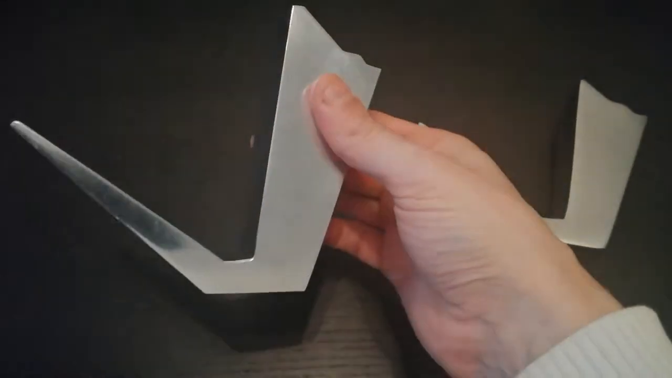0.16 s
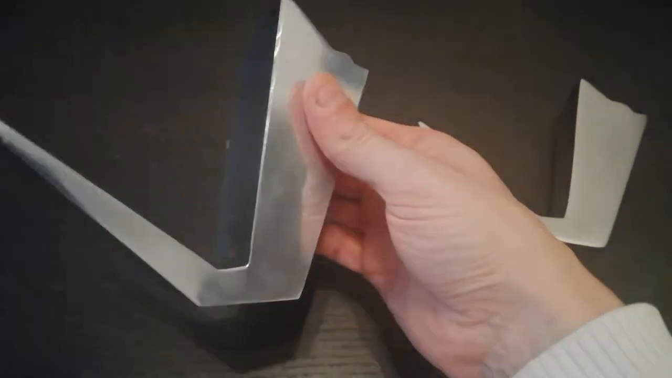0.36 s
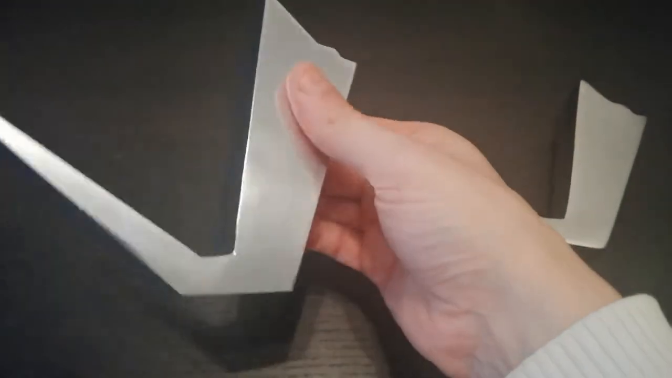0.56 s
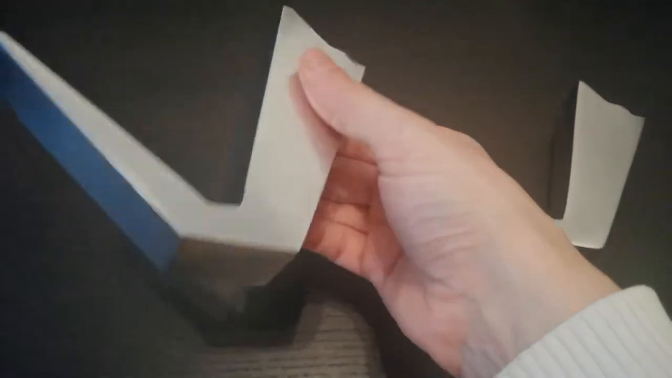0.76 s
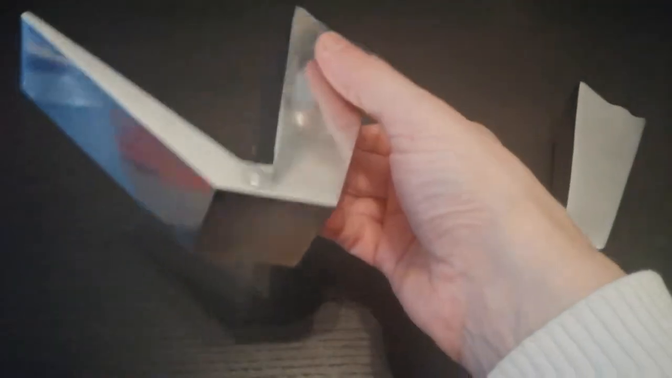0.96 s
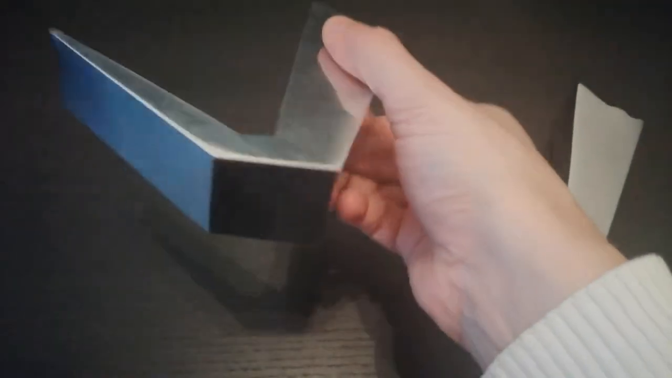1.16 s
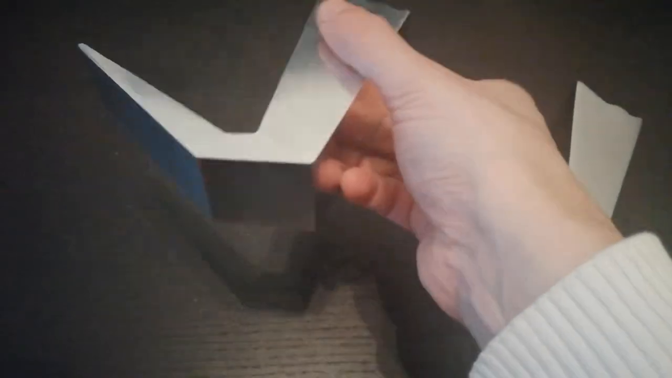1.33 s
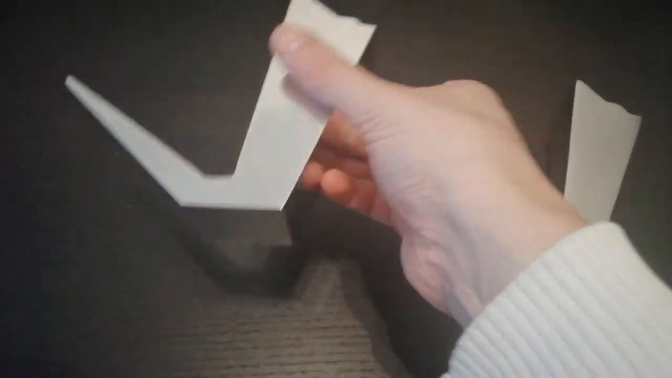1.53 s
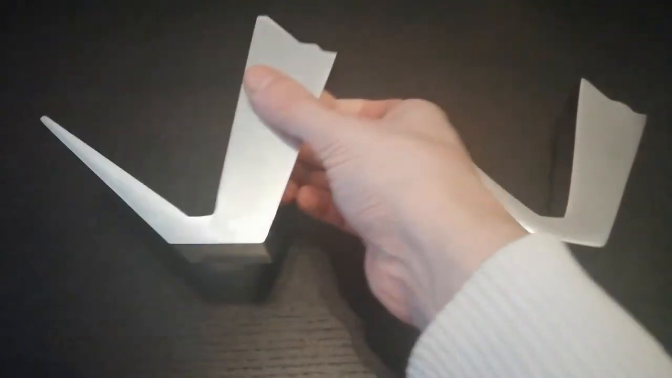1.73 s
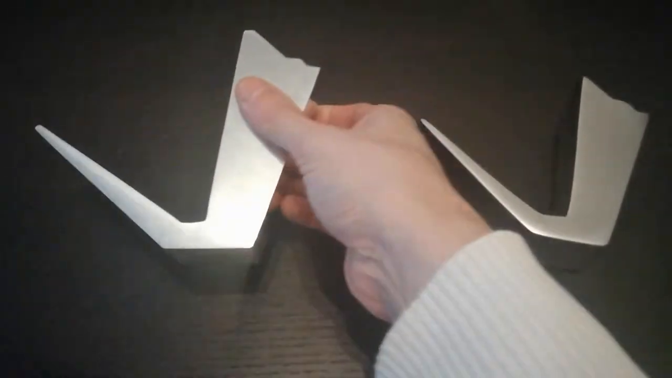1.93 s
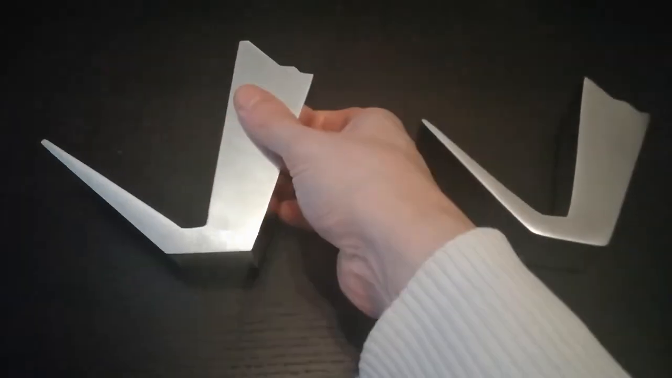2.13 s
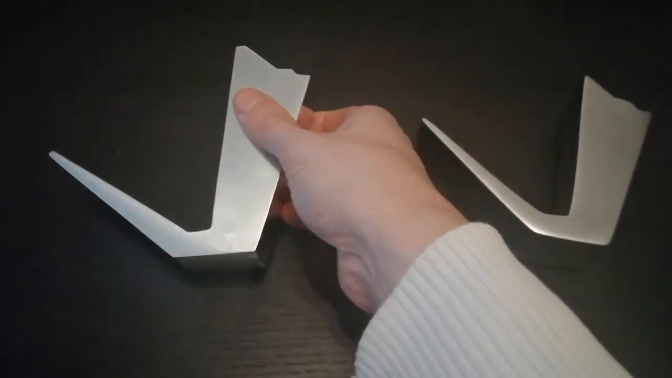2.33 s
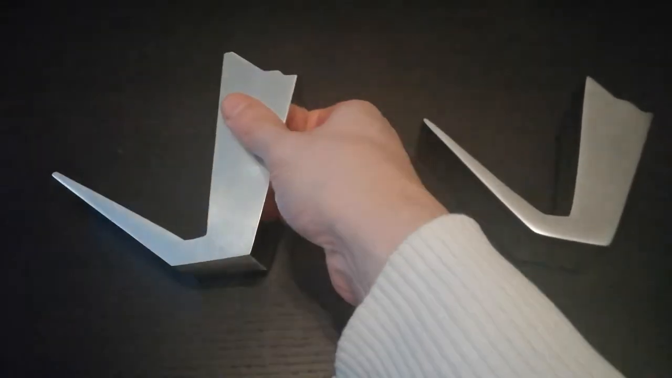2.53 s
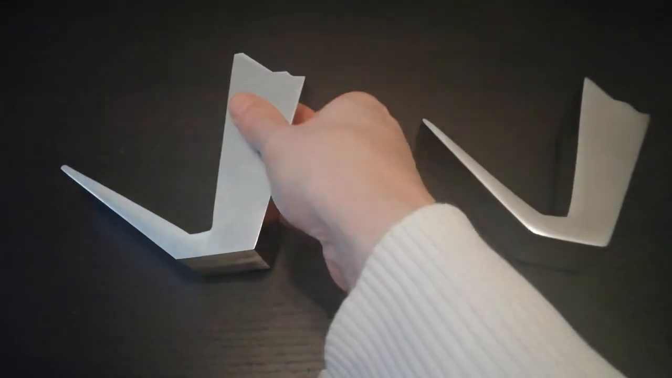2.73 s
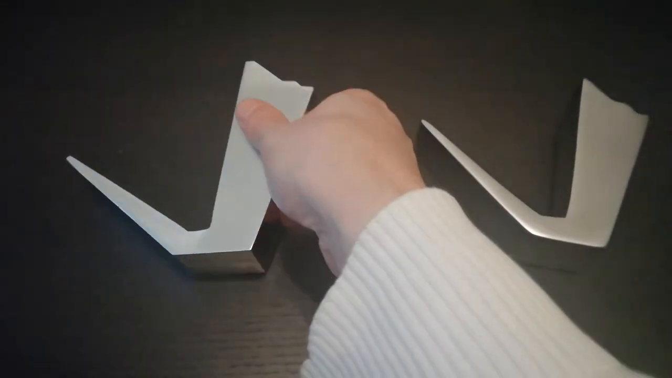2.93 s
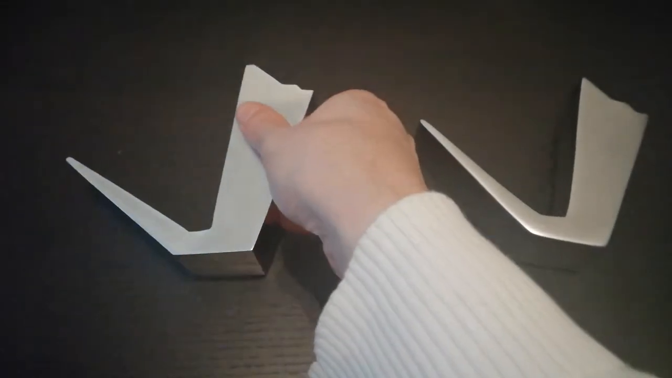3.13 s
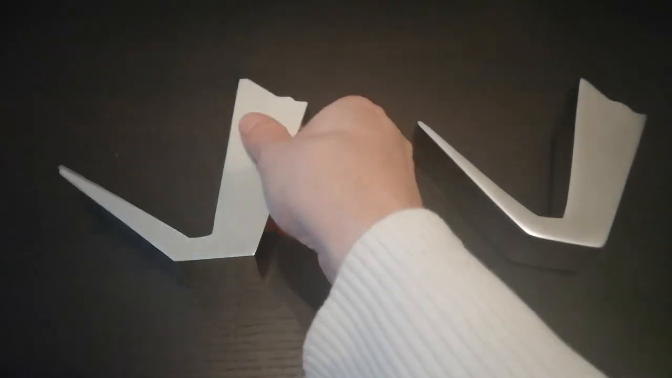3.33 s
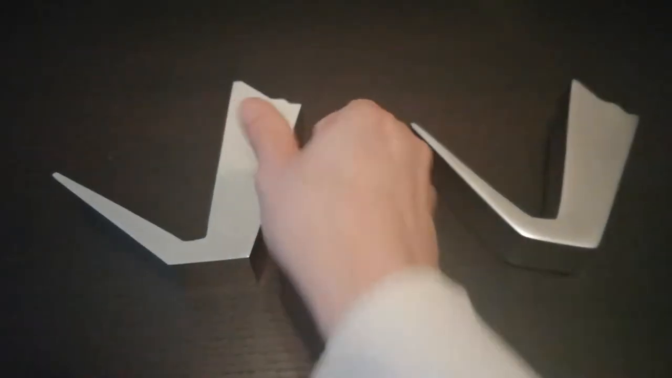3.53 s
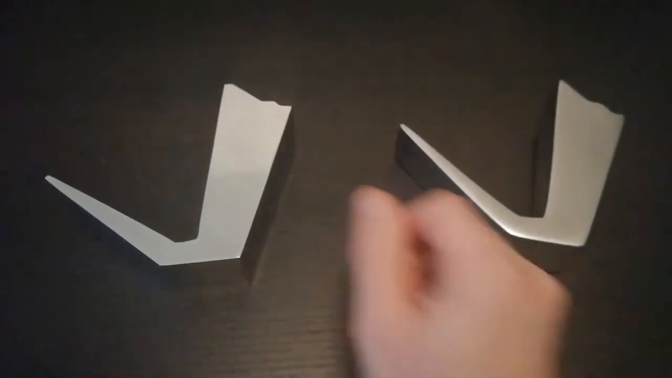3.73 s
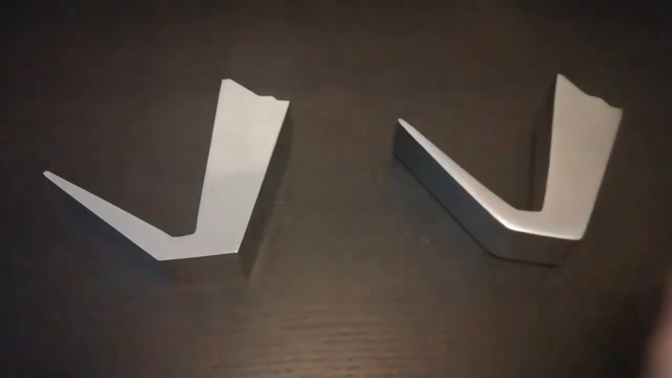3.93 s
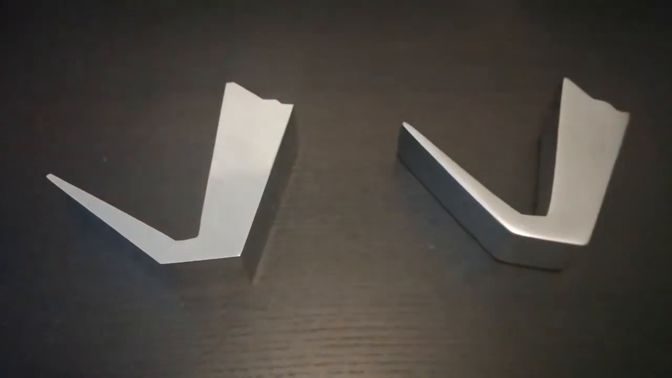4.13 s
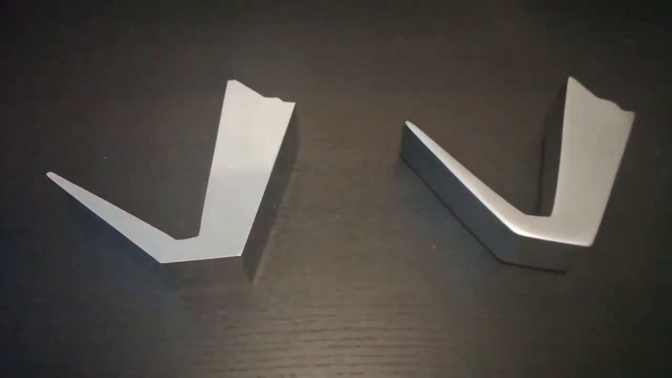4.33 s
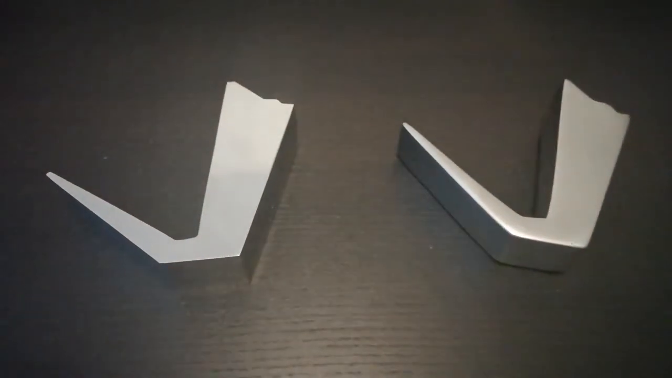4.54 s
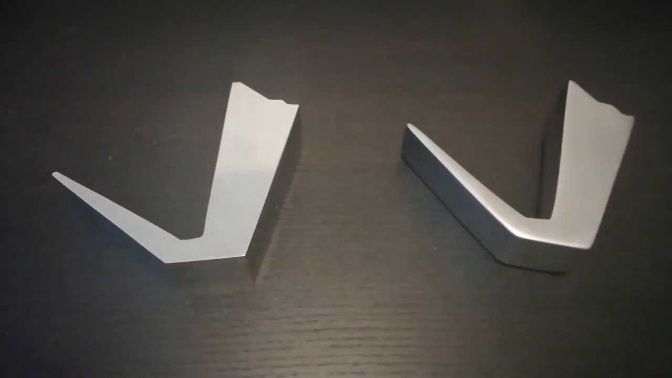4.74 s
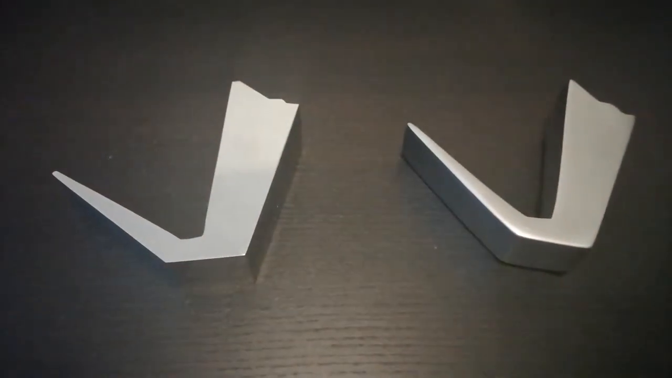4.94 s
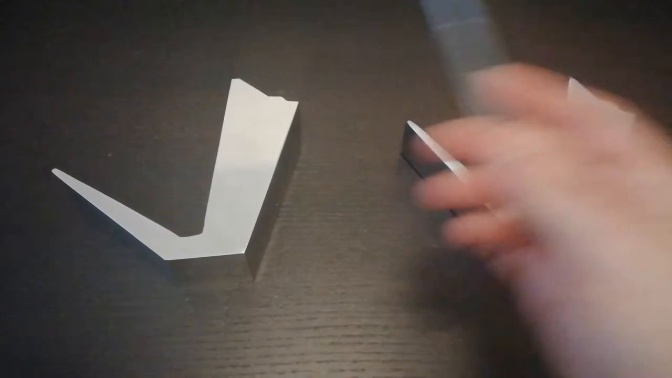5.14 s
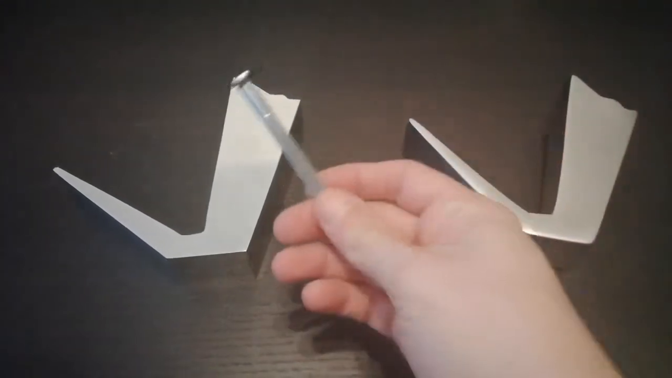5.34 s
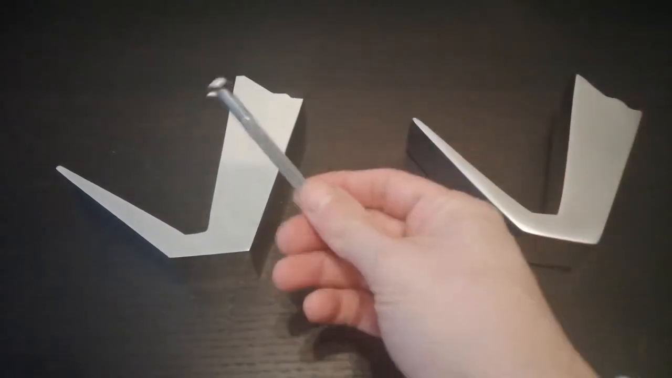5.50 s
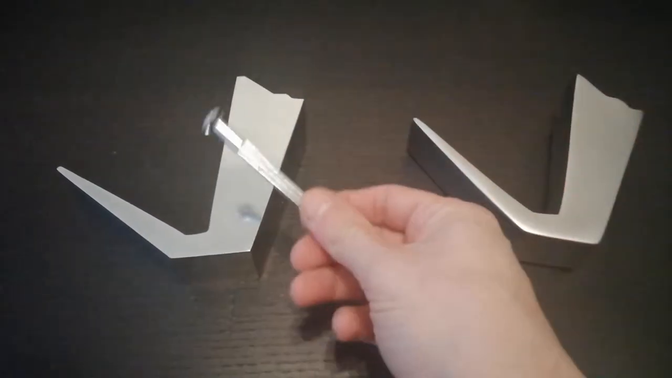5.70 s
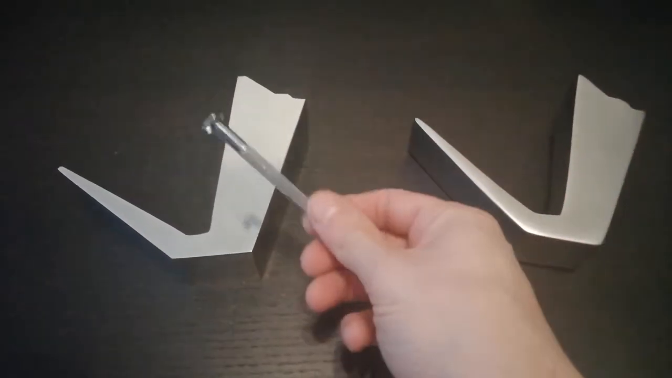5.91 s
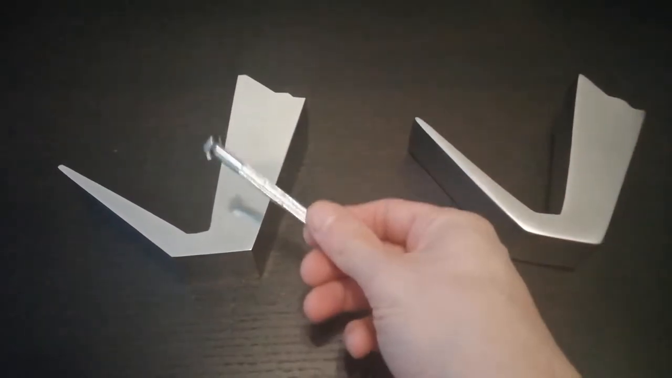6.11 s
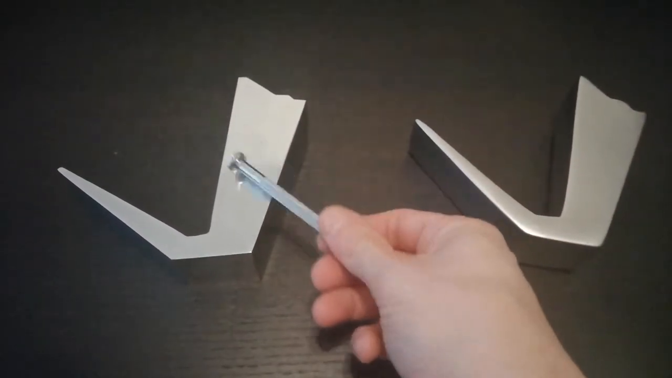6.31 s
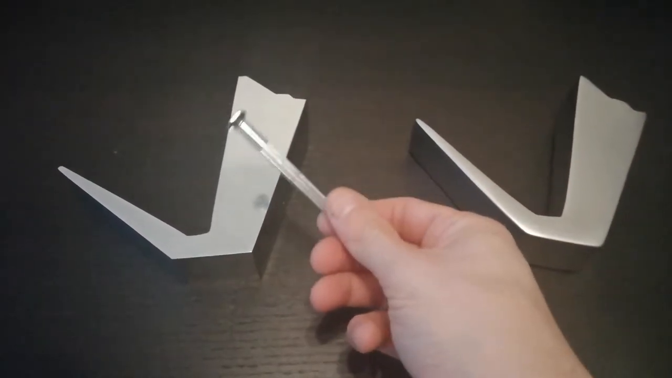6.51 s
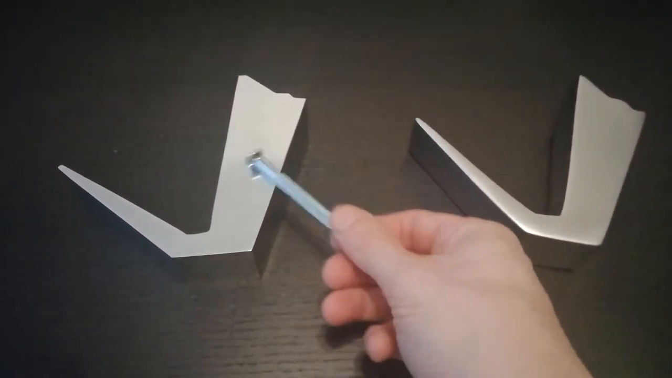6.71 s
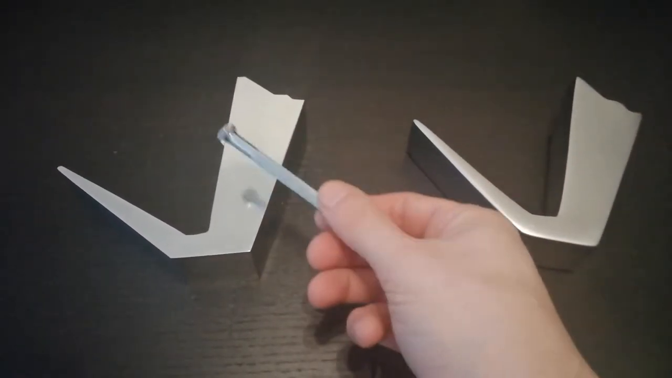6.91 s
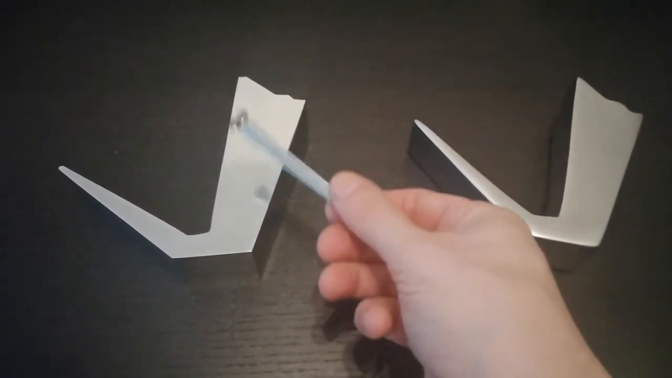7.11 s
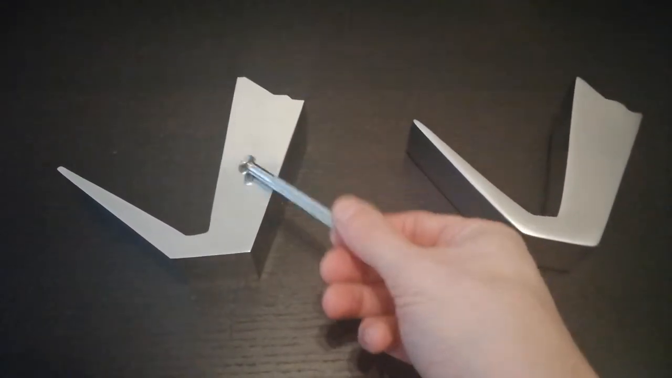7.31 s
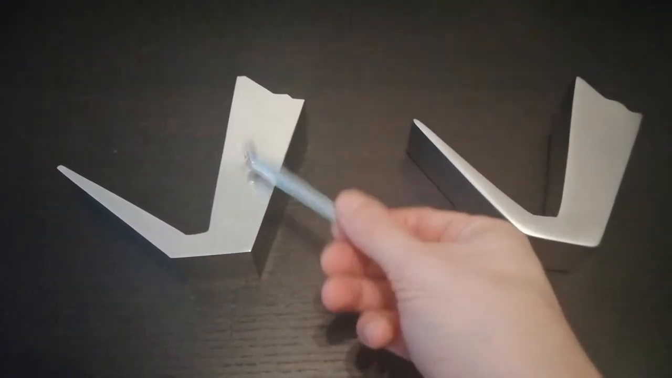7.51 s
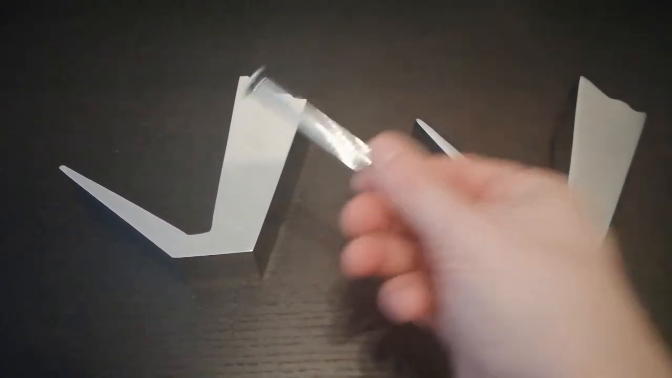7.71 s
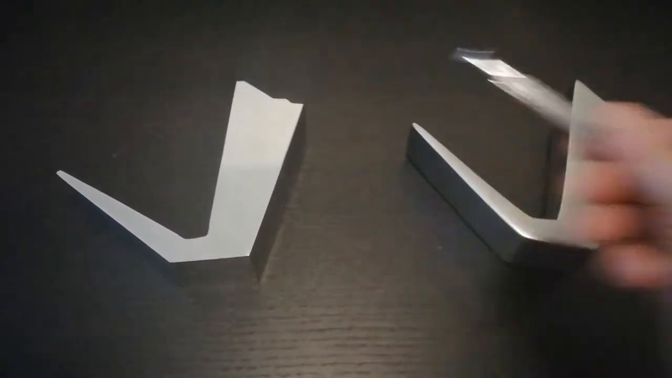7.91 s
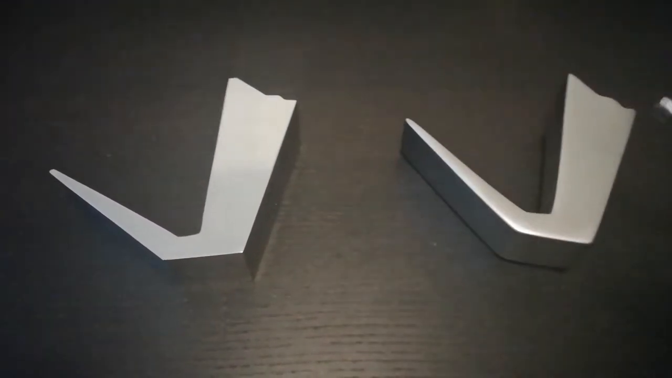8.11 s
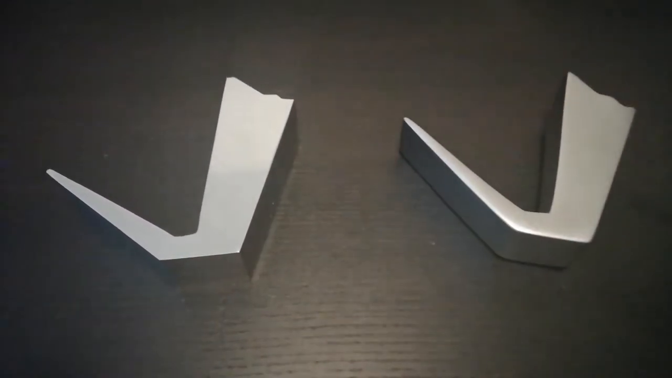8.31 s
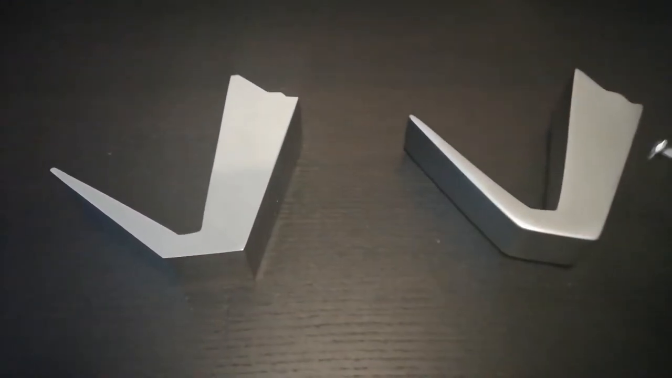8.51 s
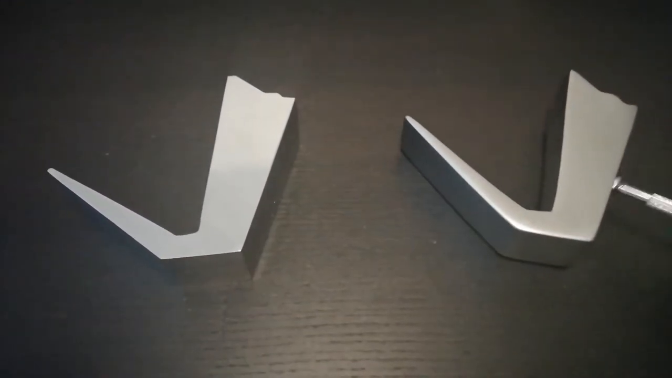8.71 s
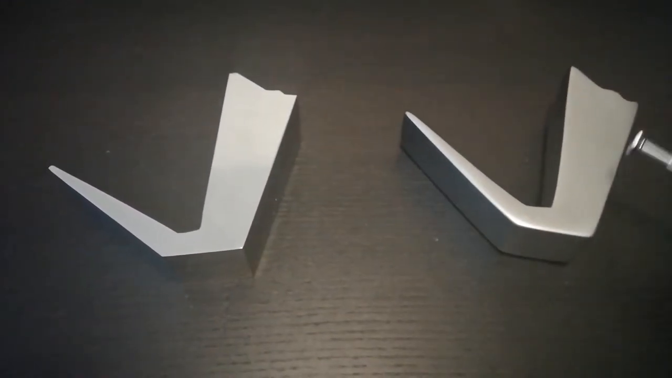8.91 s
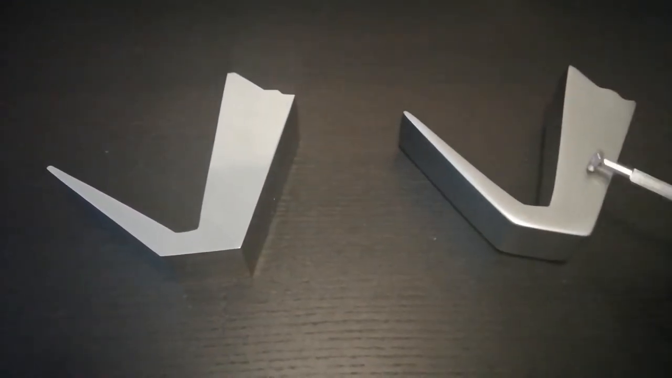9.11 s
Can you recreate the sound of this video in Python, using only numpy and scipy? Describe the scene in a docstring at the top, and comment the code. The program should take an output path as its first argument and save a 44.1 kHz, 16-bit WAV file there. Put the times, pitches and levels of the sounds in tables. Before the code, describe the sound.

Woody knocks as a steel claw is set down, tiny metallic ticks, five bright ringing rod taps, then a skittering touch and one duller tap.

```python
"""Steel claws and rod on a wooden table

In a small room, close to a phone's stereo microphone, a heavy steel claw is set down on a table in two goes.
A metal rod ticks in the fingers, taps the claw five times, skids over a second claw and taps that once.
Blows sum decaying modes of rod, claw and table with shaped noise bursts; rubs and hush are filtered noise.
The room adds a dense echo; the phone's noise suppressor shortens the tails."""
import sys
import numpy as np
from scipy import signal
from scipy.fft import rfft, irfft, next_fast_len
from scipy.io import wavfile
from scipy.ndimage import uniform_filter1d

SR = 44100
rng = np.random.default_rng(int(sys.argv[2]) if len(sys.argv) > 2 else 0)


def store_wav(level_fs):
    """Save 16-bit WAV to argv[1]."""
    pcm = np.round(np.clip(np.atleast_2d(level_fs), -1, 1) * 32767)
    wavfile.write(sys.argv[1], SR, pcm.T.astype(np.int16))


N = 403515
AGE = np.arange(32768) / SR  # seconds since a sound began
TOP_HZ = 15900  # the phone records nothing much above this

# In all tables and settings, levels are relative and t60 is the time to decay by 60 dB.

# Background hush of the room. Each row: frequency in Hz, level in dB.
HUSH_SPECTRUM = [(12, -35), (20, 2.5), (38, -7), (77, -2.5), (163, -12), (198, -6.5), (234, -14.5),
                 (337, -17), (422, -21.5), (574, -27), (2020, -19.5), (2260, -22.5), (8650, -36),
                 (14700, -42), (16000, -46.5)]
# Echo of the small room. Each row: frequency in Hz, level in dB.
ECHO_SPECTRUM = [(50, -20.5), (170, -4.5), (500, -6.5), (1400, -4), (2500, -2), (5000, -10), (8000, -6),
                 (11000, -11), (12900, -11), (14500, -21.5)]
# The claw shifts on the table, later the rod is drawn off it and a sleeve brushes by.
# Each row: loudest moment in seconds, level in dB, fade time in s, lowest and highest frequency in Hz.
RUBS = [(2.795, -46, 0.01888, 177.4, 522.4), (2.841, -49.5, 0.022, 164.6, 451.3),
        (2.945, -56.5, 0.027, 159.6, 421.8), (3.225, -58.5, 0.021, 169.1, 457.5),
        (4.615, -53.5, 0.033, 395, 1495), (4.65, -53.5, .035, 680, 3570), (4.91, -60.5, 0.049, 1900, 6023)]
# The rod's head ticks as it is handled. Each row: start in seconds, level in dB.
TICKS = [(4.616, -32.5), (4.774, -29), (5.076, -29), (5.179, -29), (5.243, -30.5), (5.605, -21.5),
         (5.863, -27.5), (5.963, -28), (6.259, -28), (6.324, -33), (6.632, -27.5), (8.065, -32.5),
         (9.048, -36)]
# Rod, damped by the fingers, lower mode first. Each row: frequency in Hz, level in dB, t60 in s.
ROD_MODES = [(5300, -10, 0.023), (10300, -10.5, 0.0035), (11088, 2, 0.019), (11240, -9, 0.0062)]
# Steel-on-steel contact. Each row: frequency in Hz, level in dB.
CONTACT_SPECTRUM = [(500, -18.5), (2500, -5), (4300, -17), (5400, 6.5), (6400, -7.5), (7800, -2.5),
                    (9800, -1), (11000, 2), (12300, -4), (13800, -8.5), (16000, -20)]
# Table top under the claw, low modes. Each row: frequency in Hz, level in dB, t60 in s.
BOOM_MODES = [(115, -10.5, 0.02), (176, 9, 0.16), (208.4, -4, 0.12), (274.3, 3.5, 0.36),
              (325.2, -0.5, 0.037), (403, 1.5, 0.079), (624, -7.5, 0.11)]
# The table top's upper resonances. Each row: frequency in Hz, level in dB, t60 in s.
CLACK_MODES = [(700, -9.5, 0.034), (926, -11, .06), (1082, -2.5, 0.22), (1204.5, -0.5, 0.078),
               (1317, 2, 0.049), (1383.3, -1.5, 0.4), (1423, -9.5, 0.051), (1768, 5.5, .06),
               (1900, -4, .07), (2100, -4, 0.015), (2480, -4.5, 0.068)]
# The table's crowded modes. Each row: frequency in Hz, level in dB.
WOOD_SPECTRUM = [(100, -10.5), (300, 1), (550, -1), (750, -9), (1050, -5), (2000, 1.5), (2600, -3),
                 (3300, -9.5), (4400, -8), (6500, -11.5), (10000, -10.5), (15000, -28.5)]
# The claw meets the table. Each row: start in seconds, force in dB, weight behind it in dB,
# contact cut-off in Hz (low when cushioned, high for a bare edge).
KNOCKS = [(2.4944, 1, 4.5, 1500), (2.518, -12.5, 9, 900), (2.632, -2, -8, 1277), (2.643, -9.5, -4.5, 1400),
          (2.664, -11.5, 7, 920), (3.362, 1.5, 0.5, 1900), (3.3872, 8, 0.5, 3105),
          (3.3953, 8.5, -5.5, 2893), (3.4125, -1.5, -2, 2440)]
# Steel edge chattering on wood. Each row: frequency in Hz, level in dB.
CHATTER_SPECTRUM = [(700, -10), (1500, 10), (2600, 9.5), (3400, -1), (4400, 0.5), (6500, -6),
                    (9000, -20.0), (11500, -14.5), (13000, -40.0)]
# First claw's free ring.
# Each row: frequency in Hz, level when tapped in dB, level when it lands in dB, t60 in s, left minus right in dB.
CLAW_MODES = [(4484, -26, -1, .5, 0), (5507, -14, -14, .17, -2), (8021, -19, -26, .26, 0),
              (8990, 0, -10, .24, -11), (11200, 0, -15, .22, 6), (12860, -5, -30, .2, 12),
              (4492, -32, -2, .5, 0)]
# Second claw, damped by the table under it. Each row: frequency in Hz, level in dB, t60 in s.
SECOND_CLAW_MODES = [(622.7, 3, 0.16), (1232, -2, 0.27), (1390, 1.5, 0.11), (2560, 7, 0.025),
                     (2890, -2.5, 0.036)]
# The rod strikes the first claw. Each row: start in seconds, force in dB, share passed to the table in dB,
# rocking frequency in Hz, the 5.5 kHz mode at the spot struck in dB.
TAPS = [(6.3573, -2.5, -3.5, 184.4, 16.5), (6.7195, -3.5, 0, 280.2, 1), (7.04, -0.5, -2.5, 232.3, -1.5),
        (7.325, -0.5, -2.5, 226.8, 2.5), (7.578, 0, 3.5, 190, -2.5)]
# First claw's low bending modes, damped by the table. Each row: frequency in Hz, level in dB, t60 in s.
CLANK_MODES = [(985, -0.5, 0.055), (1189.6, 4, 0.012), (1561, -3.5, 0.096), (1770, -10.5, 0.19),
               (2086, -10, 0.11), (2464, 1, 0.041), (2814, -9, 0.067), (3770, -4.5, 0.15)]
# Modes freed when a hard tap lifts the claw off the table. Each row: frequency in Hz, level in dB, t60 in s.
FREED_MODES = [(623.4, -4, 0.087), (2876, -2, 0.07)]

HUSH_DB, SUPPRESS_DB = -66, 6.5  # hush after the suppressor's full cut; that cut
ROOM_T60_S, ROOM_TOP_T60_S = 0.48, 0.26

TICK_LOWER_DB, TICK_PAN_DB = 6, 9  # the rod's lower mode; its upper modes, left minus right
FAINT_TICK_DB = -39.5  # fainter ticks fall at random in between

KNOCK_HZ = 2000  # the three levels below hold for a contact that reaches this high
THUD_DB, CLACK_DB, STEEL_DB = -10, 1.5, -23  # the thud is set against the boom
# A harder contact: less thud, more clack and ring.
THUD_DB_PER_OCTAVE, CLACK_DB_PER_OCTAVE, STEEL_DB_PER_OCTAVE = -2.5, 12, 7.5

SKID_S, SKID_HOP_S, SKID_HOP_GROWTH = 8.717, .01, 1.76  # start, first gap, each gap over the last
SKID_DB, SKID_DB_PER_HOP = -16, -2
# A glancing touch has less click and ping, and each hop is softer.
SKID_BRIGHT_DB, SKID_BRIGHT_DB_PER_HOP = -6.5, -2.5
SECOND_TAP_S, SECOND_TAP_DB = 9.1335, -2.5
SECOND_RING_DB, SECOND_BOOM_DB = -2, -1
PING_HZ, PING_DB, PING_T60_S = 4230, 1, .025  # the second claw's short ping under a square blow

ROD_DB, RING_DB, CLICK_DB, CLANK_DB = 7.5, 3, -0.5, -5  # what a tap of force 0 dB draws from the steel
ROCK_DB, BOOM_DB = -5.5, -14  # and, before the tap's own share, from the table
FREED_DB, FREED_DB_PER_DB = -20, 3  # freed modes' level, and its growth with the jolt to the table
CLANK_DRIFT = .015  # the contact with the table shifts the low modes from tap to tap


def amp(db):
    """Decibels to gain."""
    return 10 ** (np.asarray(db) / 20)


def unit(x):
    """Scale to unit energy per channel on average."""
    return x / np.sqrt(np.mean(np.sum(x ** 2, axis=-1)))


def pan(db):
    """Left and right gains of equal total power, for a left-minus-right difference in dB."""
    gains = amp(np.array([[db], [-db]]) / 2)
    return gains / np.sqrt(np.mean(gains ** 2))


def fade(t60):
    """Exponential decay by 60 dB in t60 seconds."""
    return np.exp(-np.log(1000) * AGE / t60)


def add(out, s, x):
    """Mix x in at time s."""
    i = int(s * SR)
    out[:, i:i + len(AGE)] += x[..., :N - i]


def band(x, lo_hz, hi_hz):
    """Band-pass, never reaching above the phone's top."""
    sos = signal.butter(2, [lo_hz, min(hi_hz, TOP_HZ)], "band", fs=SR, output="sos")
    return signal.sosfilt(sos, x)


def colour(x, points):
    """Causal minimum-phase filter through (Hz, dB) points, built by folding the cepstrum."""
    n = x.shape[-1]
    hz, db = np.transpose(points)
    bin_hz = np.arange(n // 2 + 1) * SR / n
    level_db = np.interp(np.log(bin_hz + 1), np.log(hz), db)
    cepstrum = irfft(np.log(amp(level_db)), n)
    cepstrum[1:n // 2] *= 2
    cepstrum[n // 2 + 1:] = 0
    return irfft(rfft(x) * np.exp(rfft(cepstrum)), n)


def diffuse(n, split_hz=650):
    """Noise from all sides: alike at both microphone ports in the bass, unrelated in the treble."""
    mid, side = rfft(rng.standard_normal((2, n)))
    bin_hz = np.arange(n // 2 + 1) * SR / n
    apart = 1 / (1 + (split_hz / (bin_hz + 1)) ** 2)
    opposed = np.array([[1], [-1]])
    return irfft(mid * np.sqrt(1 - apart / 2) + side * np.sqrt(apart / 2) * opposed, n)


def mode(hz, t60, spread_hz=2200):
    """One mode set going from rest; the higher it is, the more its phase can differ between the ports."""
    skew = rng.uniform(-np.pi, np.pi) * min(hz / spread_hz, 1)
    swing = np.sin(2 * np.pi * hz * AGE + skew * np.array([[.5], [-.5]]))
    return unit(swing * fade(t60))


def ring(modes):
    """A set of (Hz, dB, t60) modes struck together; neighbours swing in opposite directions."""
    return unit(sum((-1) ** k * amp(db) * mode(hz, t60) for k, (hz, db, t60) in enumerate(modes)))


def burst(t60, points):
    """Crowded modes that die together, made of noise with the given spectrum."""
    return unit(colour(diffuse(len(AGE)) * fade(t60), points))


def hush():
    """Steady rumble and hiss of the quiet room, as loud as it is before suppression."""
    noise = colour(diffuse(next_fast_len(N, True), split_hz=900), HUSH_SPECTRUM)[:, :N]
    return amp(HUSH_DB + SUPPRESS_DB) * noise / noise.std()


def room(x, build_s=.006, wet_db=0, direct_db=-2, split_hz=4800):
    """Direct sound and a dense echo whose treble dies first."""
    noise = diffuse(len(AGE))
    low = signal.sosfilt(signal.butter(5, split_hz, "low", fs=SR, output="sos"), noise)
    high = signal.sosfilt(signal.butter(5, split_hz, "high", fs=SR, output="sos"), noise)
    build = 1 - np.exp(-(AGE / build_s) ** 2)
    tail = unit((low * fade(ROOM_T60_S) + high * fade(ROOM_TOP_T60_S)) * build)
    echo = signal.oaconvolve(x, colour(tail, ECHO_SPECTRUM), axes=1)[:, :N]
    return amp(direct_db) * x + amp(wet_db) * echo


def rubs(grip_db=2.0, grip_s=0.008):
    """Short brushing strokes that swell and fade, unevenly as the surfaces catch."""
    out = np.zeros((2, N))
    middle_s = AGE.mean()
    for s, db, fade_s, lo_hz, hi_hz in RUBS:
        steps = np.arange(0, AGE[-1], grip_s)
        catching = amp(grip_db * np.interp(AGE, steps, rng.standard_normal(len(steps))))
        # filtered twice for steeper edges
        rub = band(band(diffuse(len(AGE)), lo_hz, hi_hz), lo_hz, hi_hz) * catching
        swell = np.exp(-np.abs(AGE - middle_s) / fade_s)
        add(out, s - middle_s, amp(db) * swell * rub / rub.std())
    return out


def rod(lower_db, pan_db, lower_pan_db=-1):
    """The rod's short ping; the grip shifts its pitch a little, and the upper modes beam to one side."""
    grip = 1 + 0.0016 * rng.standard_normal()
    (hz, db, t60), *upper = ROD_MODES
    lower_ping = amp(db + lower_db) * pan(lower_pan_db) * mode(hz * grip, t60)
    upper_ping = ring([(upper_hz * grip, level, decay) for upper_hz, level, decay in upper])
    return lower_ping + pan(pan_db) * upper_ping


def handling(click_db=-7, click_t60=0.0018, grip_db=3, count=5):
    """The rod's head ticks as it is picked up and aimed; the grip varies its lower mode by chance."""
    out = np.zeros((2, N))
    faint = [(s, FAINT_TICK_DB) for s in rng.uniform(TICKS[0][0], TICKS[-1][0], count)]
    for s, db in TICKS + faint:
        ping = rod(TICK_LOWER_DB + grip_db * rng.standard_normal(), TICK_PAN_DB)
        click = amp(click_db) * burst(click_t60, CONTACT_SPECTRUM)
        add(out, s, amp(db) * (ping + click))
    return out


def clack(crack_t60=.03, crack_db=4):
    """The wood's hard sound: a few clear resonances among many crowded ones."""
    return unit(ring(CLACK_MODES) + amp(crack_db) * burst(crack_t60, WOOD_SPECTRUM))


def table(thud_db, boom_db, clack_db, thud_t60=0.042, thud_hz=112, dull_t60=0.047, dull_db=-4,
          snap_hz=1500, snap_t60=0.0023, snap_db=-4):
    """The table takes the claw's weight with a sharp snap and a thud, then booms and clacks."""
    dull = unit(band(diffuse(len(AGE)) * fade(dull_t60), 110, 620))
    boom = unit(ring(BOOM_MODES) + amp(dull_db) * dull)
    hard = unit(clack() + amp(snap_db) * mode(snap_hz, snap_t60))
    thud = unit(band(mode(thud_hz, thud_t60), 55, 270))
    return amp(thud_db) * thud + amp(boom_db) * boom + amp(clack_db) * hard


def claw(landing=False, spot_db=0):
    """The first claw's thin ring; how much its second mode sounds depends on the spot struck."""
    total = 0
    for k, (hz, tap_db, land_db, t60, side_db) in enumerate(CLAW_MODES):
        level_db = (land_db if landing else tap_db) + spot_db * (k == 1)
        total = total + amp(level_db) * pan(side_db) * mode(hz, t60)
    return unit(total)


def knocks(chatter_t60=0.73, chatter_db=7, free_ring_db=-2):
    """The claw lands on one edge, rocks, and later drops flat; a softer contact takes the treble away."""
    out = np.zeros((2, N))
    for s, db, weight_db, contact_hz in KNOCKS:
        hard = np.log2(contact_hz / KNOCK_HZ)  # hardness in octaves
        thud_db = weight_db + THUD_DB + THUD_DB_PER_OCTAVE * hard
        wood = table(thud_db, weight_db, CLACK_DB + CLACK_DB_PER_OCTAVE * hard)
        # the steel edge chatters on the wood as it settles
        chatter = burst(chatter_t60, CHATTER_SPECTRUM)
        steel = amp(free_ring_db) * claw(landing=True) + amp(chatter_db) * chatter
        steel_gain = amp(STEEL_DB + STEEL_DB_PER_OCTAVE * hard)
        add(out, s, amp(db) * (band(wood, 45, contact_hz) + steel_gain * steel))
    return out


def strike(rod_db, click_db, contact_t60=0.018, rod_lower_db=-4, rod_pan_db=12):
    """Steel on steel: a bright click and the rod's ping."""
    click = burst(contact_t60, CONTACT_SPECTRUM)
    return amp(rod_db) * rod(rod_lower_db, rod_pan_db) + amp(click_db) * click


def second_claw(bright_db=0, rod_db=-1, click_db=3, wood_db=-2):
    """One touch of the rod on the second claw, which rings lower and duller than the first."""
    body = amp(SECOND_RING_DB) * (ring(SECOND_CLAW_MODES) + amp(wood_db) * clack())
    boom = amp(SECOND_BOOM_DB) * ring(BOOM_MODES)
    return amp(bright_db) * strike(rod_db, click_db) + body + boom


def second_taps(count=5):
    """The rod skids over the second claw in a few hops, then strikes it squarely."""
    out, s = np.zeros((2, N)), SKID_S
    for hop in range(count):
        touch = second_claw(SKID_BRIGHT_DB + SKID_BRIGHT_DB_PER_HOP * hop)
        add(out, s, amp(SKID_DB + SKID_DB_PER_HOP * hop) * touch)
        s += SKID_HOP_S * SKID_HOP_GROWTH ** hop
    ping = amp(PING_DB) * mode(PING_HZ, PING_T60_S)
    add(out, SECOND_TAP_S, amp(SECOND_TAP_DB) * second_claw() + ping)
    return band(out, 220, TOP_HZ)


def rock(hz, rock_t60=0.083, jolt_t60=0.17, jolt_db=0):
    """A tapped claw rocks against the table top and jolts its crowded low modes."""
    jolt = unit(band(diffuse(len(AGE)) * fade(jolt_t60), 0.78 * hz, 1.1 * hz))
    return unit(mode(hz, rock_t60) + amp(jolt_db) * jolt)


def taps(wood_t60=0.012, wood_db=0, rattle_t60=.07, rattle_db=0):
    """The rod strikes the first claw: both ring, and part of the blow passes into the table."""
    out = np.zeros((2, N))
    for s, db, table_db, rock_hz, spot_db in TAPS:
        shifted = [(hz * (1 + CLANK_DRIFT * rng.standard_normal()), level, t60)
                   for hz, level, t60 in CLANK_MODES]
        clank = unit(ring(shifted) + amp(wood_db) * burst(wood_t60, WOOD_SPECTRUM))
        steel = strike(ROD_DB, CLICK_DB) + amp(RING_DB) * claw(spot_db=spot_db) + amp(CLANK_DB) * clank
        # a hard tap lifts the claw off the table, so it rattles
        rattle = unit(ring(FREED_MODES) + amp(rattle_db) * burst(rattle_t60, WOOD_SPECTRUM))
        freed = amp(FREED_DB + FREED_DB_PER_DB * (db + table_db)) * rattle
        boom = unit(band(ring(BOOM_MODES), 310, 3016))  # so short a blow favours the table's higher modes
        wood = amp(ROCK_DB) * rock(rock_hz) + amp(BOOM_DB) * boom
        add(out, s, amp(db) * (steel + freed + amp(table_db) * wood))
    return band(out, 160, TOP_HZ)


def scene():
    """All blows and handling sounds in the room, over its hush."""
    return hush() + room(rubs() + handling() + knocks() + second_taps() + taps())


def suppress(x, shut_db=8.0, open_db=19):
    """Noise suppressor: each band is turned down as it sinks towards its own usual (median) level."""
    size = 512
    bins = signal.stft(x, nperseg=size)[2]
    power = np.mean(np.abs(bins) ** 2, axis=0)
    # smoothed over neighbouring bands, then over time
    power = uniform_filter1d(uniform_filter1d(power, size=7, axis=0), size=3, axis=1)
    usual = np.median(power, axis=1, keepdims=True)
    over_db = 10 * np.log10(np.maximum(power / usual, 1))
    gain = amp(np.interp(over_db, [shut_db, open_db], [-SUPPRESS_DB, 0]))
    return signal.istft(bins * gain, nperseg=size)[1][:, :N]


def record(dry):
    """The phone suppresses noise, rounds the loudest peaks and cuts the top."""
    rounded = np.tanh(suppress(dry))
    return signal.sosfilt(signal.ellip(8, .2, 70, TOP_HZ, fs=SR, output="sos"), rounded)


dry = scene()
out = record(dry)
store_wav(out)
```